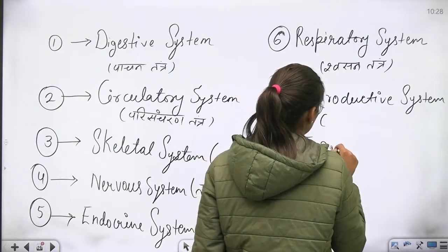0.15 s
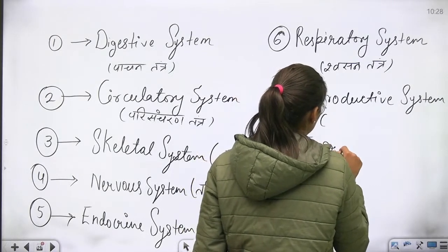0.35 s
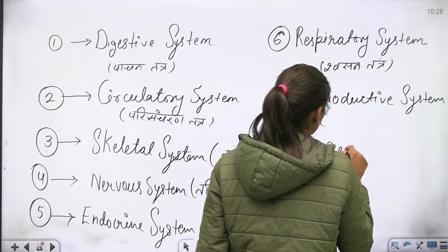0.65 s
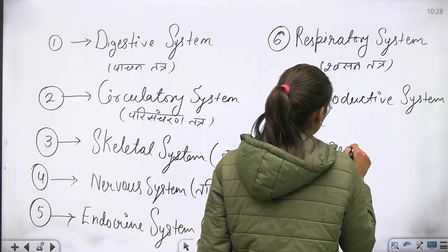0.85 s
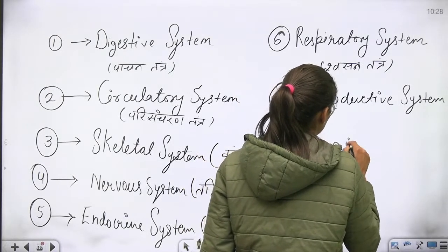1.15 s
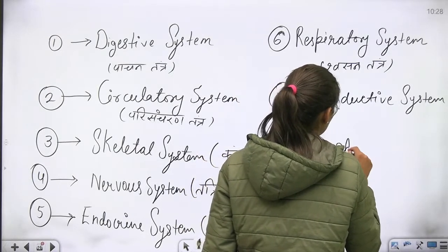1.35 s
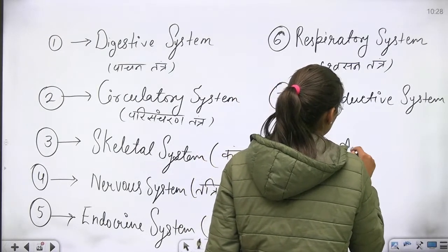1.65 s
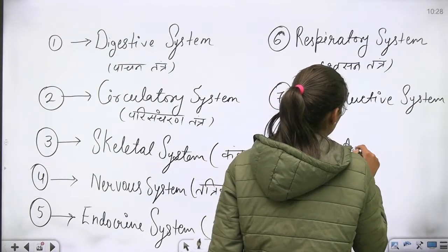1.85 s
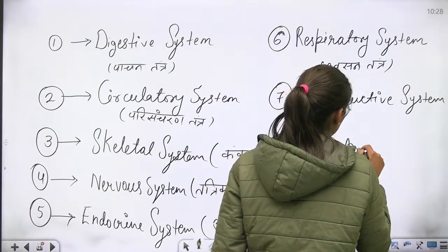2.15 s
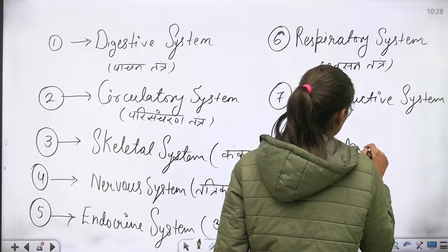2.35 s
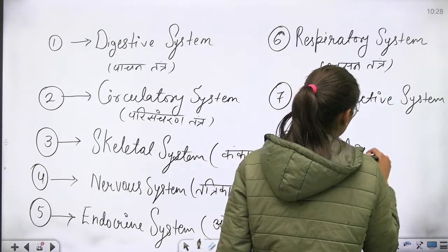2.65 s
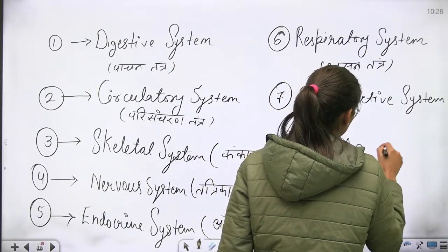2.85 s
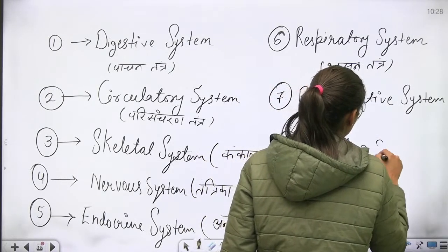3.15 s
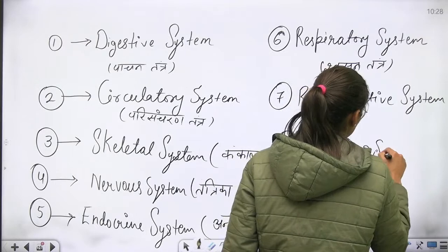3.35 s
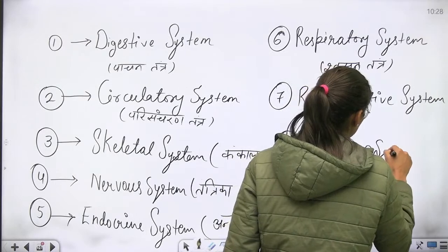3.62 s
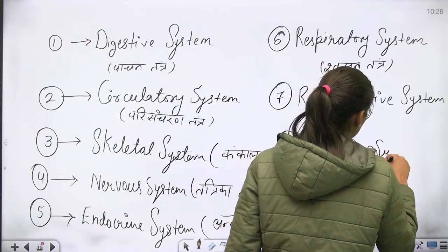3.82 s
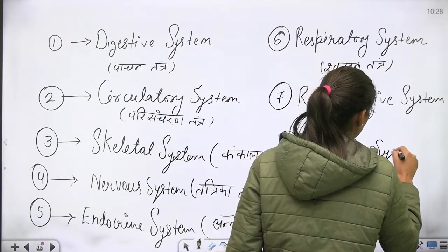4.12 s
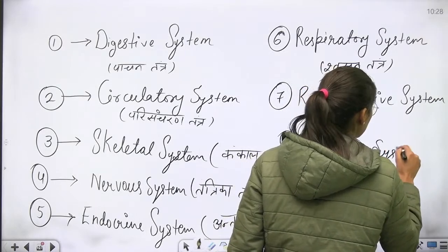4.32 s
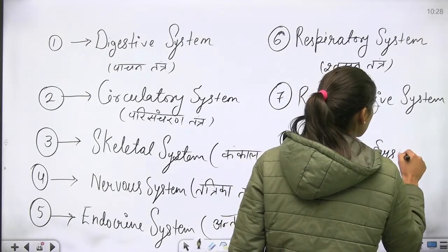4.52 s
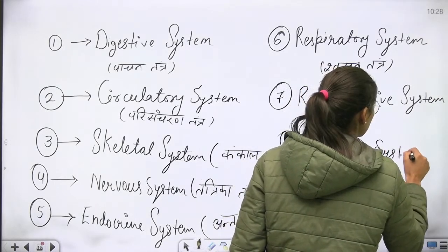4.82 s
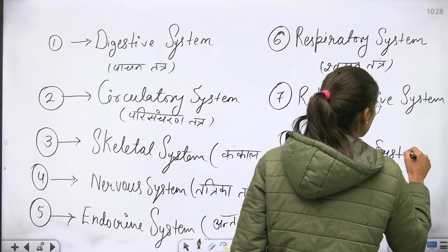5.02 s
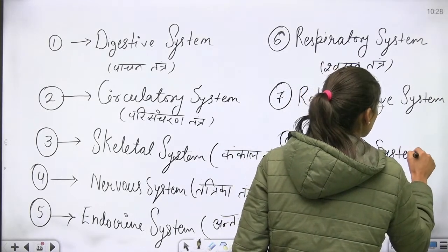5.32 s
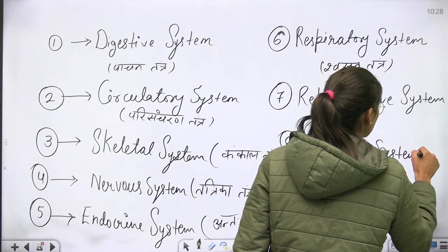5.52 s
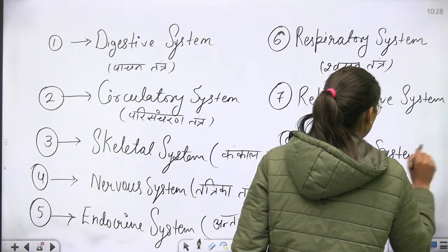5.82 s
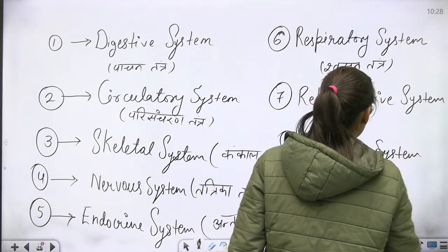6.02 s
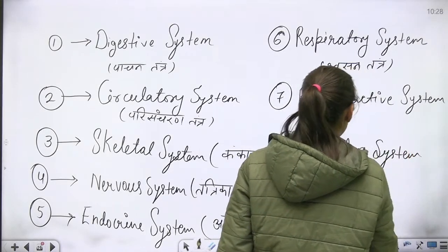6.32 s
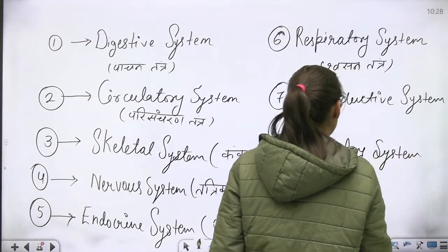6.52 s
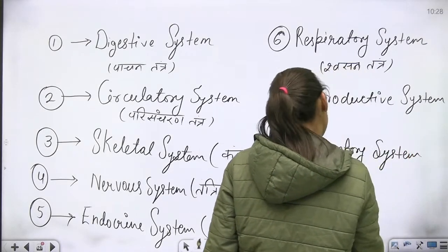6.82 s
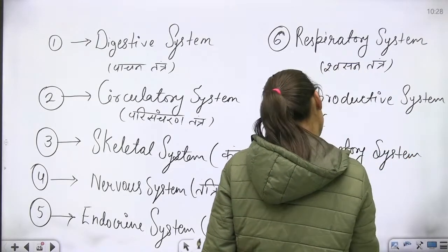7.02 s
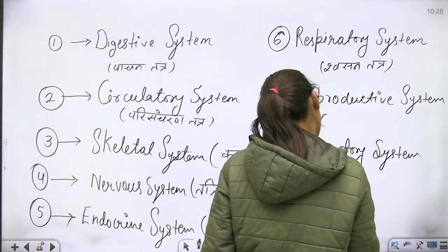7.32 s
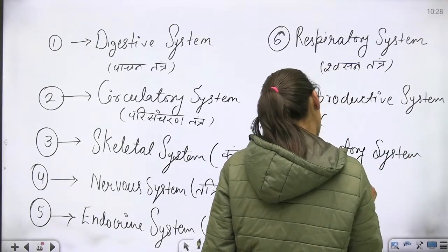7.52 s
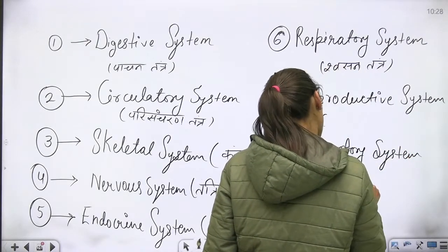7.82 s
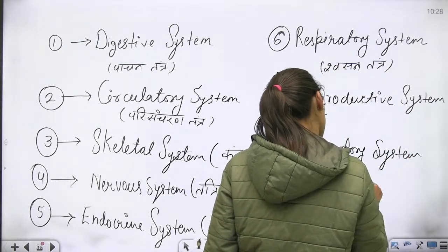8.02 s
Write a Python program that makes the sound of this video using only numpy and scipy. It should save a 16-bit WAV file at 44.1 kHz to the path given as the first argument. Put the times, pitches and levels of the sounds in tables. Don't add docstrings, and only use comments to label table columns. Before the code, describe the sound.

Close, right-leaning pickup of a pen writing on a large glass board in a quiet room. Writing is already under way: faint, thin hissing strokes in quick clusters. Single hard knocks begin new words, each with a bright plastic crack and a short hollow pane ring. Tiny falling squeaks and ticks slip between. Later a hand brushes, a sleeve rustles and knocks crowd together over low fan hum.

```python
import sys
import numpy as np
from scipy import signal
from scipy.fft import rfft, irfft
from scipy.io import wavfile
from scipy.ndimage import uniform_filter1d

SR = 44100
rng = np.random.default_rng(int(sys.argv[2]) if len(sys.argv) > 2 else 0)


def store_pcm(level_fs):
    pcm = np.round(np.clip(level_fs, -1, 1) * 32767).astype(np.int16)
    wavfile.write(sys.argv[1], SR, np.atleast_2d(pcm).T)


def volts_from_decibels(level):
    exponent = np.asarray(level, float) / 20
    return 10 ** exponent


N = 359850


def evened(x):
    return x / np.sqrt(np.mean(x ** 2) + 1e-20)


def read(points, hz):
    f, value = np.transpose(points)
    return np.interp(np.log(hz + 1), np.log(f + 1), value)


def add(mix, s, sound):
    part = mix[round(s * SR):][:len(sound)]
    part += sound[:len(part)]


def resonate(x, hz, width):
    turn = np.exp(2j * np.pi * np.cumsum(hz * np.ones(len(x))) / SR)
    r = np.exp(-np.pi * width / SR)
    return 2 * (turn * signal.lfilter([1 - r], [1, -r], x * turn.conj())).real


def fuzzy(x, hz, width):
    return evened(resonate(resonate(x, hz, width), hz, 2 * width))


def noise(count, size, shape_db):
    hop = size // 4
    hz = np.fft.rfftfreq(size, 1 / SR)[:, None]
    t = np.arange(count // hop + 5) * hop / SR
    a, b = rng.standard_normal((len(t), len(hz), 2)).T
    spectra = (a + 1j * b) * volts_from_decibels(shape_db(hz, t))
    return signal.istft(spectra, nperseg=size, noverlap=size - hop)[1][:count]


def wander(per_s):
    width = round(SR / per_s)
    return evened(uniform_filter1d(uniform_filter1d(rng.standard_normal(N), width), width))


def low_pass(x, hz):
    return signal.oaconvolve(x, signal.firwin(601, hz, window=("kaiser", 9), fs=SR)[None], "same")


def push(t):
    u = t / .00042
    swing = -u ** 2 * np.exp(2 - 2 * u) + 0.32 * (u / 1.6) ** 3 * np.exp(3 - 3 * u / 1.6)
    return signal.lfilter(*signal.butter(1, 350, "high", fs=SR), swing)


def barrel_db(f, rings, top_db):
    peaks_db = sum(db * np.exp(-((f - hz) / 182) ** 2 / 2) for hz, db in rings)
    return peaks_db + top_db * np.clip(f / 8000 - 1, 0, 1)


# f/Hz, level/dB
CRACK_COLOUR = [(710, -36), (1200, -23), (1810, -8), (2600, -1.5), (4190, 0), (5970, 2), (8700, -2),
                (9720, 1.5), (12800, -2), (14300, -7), (15600, -16), (16900, -36)]


def crack(t, rings, top_db):
    burst = evened(noise(512, 64, lambda f, s: read(CRACK_COLOUR, f) + 0 * s))
    burst = burst * np.minimum(t / .0005, 1) * volts_from_decibels(-60 * t / .012)
    z, bins = rfft(burst, 1024), np.fft.rfftfreq(1024, 1 / SR)
    colour = volts_from_decibels(read(CRACK_COLOUR, bins) + barrel_db(bins, rings, top_db))
    even = colour / np.sqrt(uniform_filter1d(abs(z) ** 2, size=7) + 1e-9)
    t60_s = 0.09
    rung = irfft(z * even)[:512] * volts_from_decibels(-60 * t / t60_s)
    return evened(rung) * np.sqrt(np.mean(burst ** 2))


# f/Hz, level/dB
TAIL_COLOUR = [(35, -31), (60, -21.5), (154, -12.5), (350, -14), (573, -10.5), (815, -19), (938, -15.5),
               (1900, -32.5), (2640, -33), (4030, -37.5), (6010, -34), (9840, -32.5), (15000, -46.5),
               (16500, -67.5)]
# f/Hz, t60/s
ROOM_T60 = [(100, 0.49), (260, 0.84), (700, 0.66), (1840, 0.55), (4850, 0.55), (12800, 0.34)]


def room_tail(t, hz, upper_hz, crack_db, ring_db, rings, top_db):
    boom_db, rise_s = -20.5, 0.0017
    bright_db = -16.5 + 0.82 * crack_db - ring_db

    def place_db(f):
        main_db = 9.4 * np.exp(-(np.log(f / hz) / 0.075) ** 2)
        upper_db = 2.6 * np.exp(-(np.log(f / upper_hz) / 0.026) ** 2)
        under_db = -2 * ((f > 240) & (f < .8 * hz))
        return main_db + upper_db + under_db + (boom_db - ring_db) * (f < 300)

    def lumps(f, s):
        field = rng.standard_normal((len(s), len(f)))
        return evened(uniform_filter1d(uniform_filter1d(field, size=8, axis=0), size=9, axis=1)).T

    def tail_db(f, s):
        bright = np.clip((f - 1500) / 1000, 0, 1)
        sparkle_db = bright_db + 0.25 * barrel_db(f, rings, top_db) + 1.1 * lumps(f, s) - .6
        low_db = read(TAIL_COLOUR, f) + 0.51 * place_db(f + 1) - 1 * (f < 1200)
        return low_db + bright * sparkle_db - 40 * (f > 15600) - 60 * s / read(ROOM_T60, f)
    return volts_from_decibels(ring_db + 12.5) * noise(len(t), 512, tail_db) * (1 - np.exp(-t / rise_s))


def knock(db, hz, crack_db, ring_db, top_db, rebound_s, upper_hz, rings, rebound_db):
    t = np.arange(SR * 3 // 5) / SR
    out = room_tail(t, hz, upper_hz, crack_db, ring_db, rings, top_db)
    for f, patch_db in (hz, -9.5), (upper_hz, -12.5):
        ring = -np.sin(2 * np.pi * f * t) * np.minimum(t / 0.00019, 1)
        out += volts_from_decibels(patch_db - 60 * t / 0.027) * ring
    direct = volts_from_decibels(-4.0) * push(t[:512]) + volts_from_decibels(crack_db + 7.0) * crack(t[:512], rings, top_db)
    for delay_s, echo_db in (0, 1.5), (rebound_s, rebound_db), (.0042, -22), (.0062, -28):
        add(out, delay_s, volts_from_decibels(echo_db) * direct)
    return volts_from_decibels(db) * out


# t/s, peak level/dB, pane colour f/Hz, crack level/dB, pane ring level/dB
KNOCKS = [(1.455, -15.5, 570, -10, -28), (2.942, -19, 690, -15.5, -28), (4.44, -15, 500, -8, -27.5),
          (4.688, -12.5, 520, -15, -27), (4.863, -13, 570, -17, -29.5), (6.262, -16.5, 505, -6.5, -29.5),
          (6.618, -12.5, 565, -17, -30.5), (7.209, -16, 633, -24.5, -28.5), (7.507, -13, 635, -12, -28.5),
          (7.94, -11.5, 640, -17, -29), (8.125, -16.5, 590, -10.5, -26.5)]
# t/s, top of the crack level/dB, rebound delay t/s, upper pane colour f/Hz
PEN_ANGLES = [(1.455, 1, 0.0031, 930), (2.9418, -4, 0.002, 1030), (4.4397, 1, 0.0026, 986),
              (4.6876, 0, 0.0029, 854), (4.8634, 1, 0.0025, 914), (6.2606, -1, 0.0019, 950),
              (6.6184, 1, 0.0024, 960), (7.2093, -7, 0.0024, 1040), (7.5066, 2, 0.0033, 1094),
              (7.94, -1, 0.0037, 1083), (8.1248, -1, 0.0027, 1075)]
# f/Hz, level/dB over the crack
LANDING_RINGS = [
    [(2950, 0.5), (5240, 10), (6260, 10.5), (7200, 4), (9860, 7), (11800, 8), (4000, -9), (13400, -12)],
    [(2430, 13), (3300, 10), (5830, 12), (7200, 10), (10490, 6), (11300, 3), (9020, -13.5), (3900, -2)],
    [(3000, 11.5), (5920, 13), (7860, 6), (9800, 5), (10200, -10), (4500, -4), (6600, -3), (10720, 4),
     (11900, 7)],
    [(2760, 13.5), (6400, 7), (4540, 3), (5400, 9), (6080, 9.5), (7500, 7), (11800, 5)],
    [(2780, 10), (6400, 15), (8160, 12), (10500, 9), (4040, -15), (11250, -14), (12490, 7), (15550, 6)],
    [(1290, 24), (2400, 12), (3100, 3), (3630, 6), (4200, 3), (4700, 6), (5040, 2), (7100, 8), (9930, 6.5),
     (8600, -8), (13800, -14), (14700, 11)],
    [(2570, 11.5), (3420, 12), (5080, 9), (7800, 14), (3000, -14), (6700, -9), (8700, -8), (13700, -12),
     (9860, 10), (11600, 5)],
    [(2900, -1), (6850, 17), (7730, 16), (9190, 10), (10550, -3), (12450, 7)],
    [(2560, 12.5), (7400, 2), (9150, -9), (9880, 0), (11030, 2), (12880, 13), (15530, 17)],
    [(2600, 15), (7350, 12.5), (10000, 4), (8700, -10), (10750, 11), (12000, -12), (12510, 9), (13600, 6),
     (15370, 22)],
    [(2540, 10.5), (5000, 8), (7400, 10), (9600, -1), (3300, -5), (6700, -12), (10600, -10), (11300, 11),
     (13030, 15)],
]
REBOUND_DB = [-14, -13, -12, -14, -11, -6, -10, -14, -12, -14, -14]


def landings(mix):
    for (_, *hit), (s, *angle), rings, rebound_db in zip(KNOCKS, PEN_ANGLES, LANDING_RINGS, REBOUND_DB):
        add(mix, s + .001, knock(*hit, *angle, rings, rebound_db))


# f/Hz, t60/s
PANE_T60 = [(130, 0.67), (190, 0.67), (280, 0.41), (420, 0.53), (500, 0.15), (590, 0.43), (760, 0.66),
            (1000, 0.44), (2300, 0.46)]


def pane(modes):
    t, out = np.arange(SR * 3 // 5) / SR, 0
    for (f, db), (phase, beat) in zip(modes, rng.random((len(modes), 2))):
        waver = 1 + 0.15 * np.sin(2 * np.pi * (11.6 * t + beat))
        rise = 1 - np.exp(-t * f / 1.3)
        fade = volts_from_decibels(db + 1.5 - 60 * t / read(PANE_T60, f))
        out = out + fade * rise * waver * np.sin(2 * np.pi * (f * t + phase))
    return out


# f/Hz, level/dB
EARLY_MODES = [
    [(160, -42.5), (253, -47), (344, -49), (465, -45), (576, -38.5), (694, -63), (931, -45.5),
     (1000, -45.5), (2148, -64), (2690, -60)],
    [(135, -41.5), (158, -42.5), (247, -43), (433, -50), (532, -43), (635, -46), (686, -47), (931, -52)],
    [(95, -46), (130, -38.5), (166, -38), (191, -40.5), (317, -47), (409, -39.5), (457, -46), (520, -41),
     (559, -44), (590, -44), (635, -47), (990, -56), (2586, -53)],
]
# f/Hz, level/dB
LATER_MODES = [
    [(129.6, -35), (165.6, -41), (191.5, -40), (1475, -51), (2770, -64), (236.7, -46), (412, -38),
     (453, -41), (500, -39), (571, -35.5), (632, -38.5), (890, -46), (955, -42), (530, -46)],
    [(109, -45), (164.8, -41), (190, -44), (1276, -57), (1450, -57), (2680, -63), (277, -42.5),
     (405, -40.5), (450, -34.5), (538, -32), (643, -41), (770, -51), (1025, -56)],
    [(160.3, -40), (250, -45), (1023, -52), (301, -45), (464, -41), (541, -41.5), (1337, -52), (1980, -54),
     (2210, -54), (2387, -55)],
    [(112, -49), (137, -45), (164, -43), (192, -52), (290, -50), (549, -33), (585, -49), (640, -44),
     (928, -50), (1000, -50), (1092, -50), (1351, -62)],
    [(131.4, -42.5), (192.5, -46), (158.5, -43), (417, -48), (545, -39), (588, -38), (660, -51),
     (780, -49.5), (930, -49.5), (1140, -52), (310, -57)],
    [(131.9, -37), (155.4, -48), (1230, -56), (2600, -65), (2920, -57), (192, -37), (407, -43.5),
     (520, -47), (592, -32), (347, -46), (761, -47), (931, -47), (1061, -45.5)],
    [(135, -39), (192, -37), (357, -47), (411, -45), (500, -54), (589, -32), (659, -36), (928, -42.5),
     (1170, -49)],
    [(192, -41), (411, -50), (500, -41), (589, -42), (659, -40), (928, -61), (1070, -54), (2500, -60)],
]


def pane_rings(mix):
    for (s, *_), modes in zip(PEN_ANGLES, EARLY_MODES + LATER_MODES):
        add(mix, s + .001, pane(modes))


# t/s, length t/s, hiss level/dB at start, hiss level/dB at end
STROKES = [(0, 0.031, -62, -65), (0.061, 0.037, -57, -62), (0.141, 0.047, -56, -59.5),
           (0.255, 0.1, -58.5, -66), (0.354, 0.039, -60.5, -54), (0.398, 0.067, -55.5, -65),
           (0.502, 0.062, -59, -56.5), (0.588, .06, -63, -63), (0.658, 0.12, -57.5, -66.5),
           (.8, .05, -75, -78), (0.987, 0.11, -67.5, -67.5), (1.162, 0.084, -53.5, -59),
           (1.252, 0.04, -66, -78),
           (1.55, 0.03, -61.5, -69), (1.635, 0.049, -59, -54.5), (1.72, 0.052, -60.5, -64),
               (1.79, 0.082, -67, -65), (1.889, 0.055, -59, -62.5), (1.975, 0.044, -60, -65),
               (2.065, 0.062, -58, -59.5), (2.175, 0.042, -60.5, -63), (2.25, 0.074, -60.5, -57.5),
               (2.39, 0.12, -55.5, -59.5), (2.53, 0.12, -57.5, -57), (3.02, 0.083, -62, -63),
               (3.11, 0.083, -59, -61), (3.235, 0.043, -58.5, -58), (3.335, 0.058, -59.5, -64.5),
               (3.41, 0.093, -63, -59), (3.55, 0.043, -60, -60.5), (3.629, 0.067, -63, -57.5),
               (3.745, 0.11, -56, -60.5), (3.85, 0.066, -62, -62), (3.925, 0.13, -54.5, -62),
               (4.085, 0.14, -60.5, -65),
           (4.95, .03, -64, -69), (5.04, 0.054, -55.5, -62), (5.15, 0.07, -61.5, -58),
              (5.262, 0.03, -57, -60), (5.365, 0.042, -60.5, -59), (5.455, 0.036, -63, -63),
              (5.56, 0.056, -59.5, -58.5), (5.655, 0.056, -60.5, -63.5), (6.3, 0.093, -62, -57),
              (6.43, .06, -72, -73), (6.7, 0.1, -71, -67), (6.875, 0.15, -64, -62.5),
              (7.05, 0.13, -74, -80), (7.24, 0.1, -62, -67), (7.36, 0.075, -81, -79),
              (7.6, 0.073, -68, -71), (7.72, 0.068, -66, -61.5), (8.0, .05, -74, -85)]


def hand_speed():
    rise_db_per_s, stop_db_per_s, hover_db = 491, 700., -94
    t = np.arange(0, N + 64, 64) / SR
    start, length, first_db, last_db = np.array(STROKES).T[:, :, None]
    done = np.clip((t - start) / length, 0, 1)
    edge_db = rise_db_per_s * np.maximum(start - t, 0)
    edge_db = edge_db + stop_db_per_s * np.maximum(t - start - length, 0)
    each_db = first_db + (last_db - first_db) * done - edge_db
    done = uniform_filter1d(done[each_db.argmax(0), np.arange(len(t))], size=9)
    speed_db = np.maximum(each_db.max(0), hover_db)
    return [np.interp(np.arange(N) / SR, t, curve) for curve in (speed_db, done)]


# f/Hz, level/dB
BARREL = [(3900, -23.5), (4480, -17), (4750, -8), (5600, -7.5), (6500, -11), (6980, -9.5), (7400, -11),
          (8700, -10.5), (9550, -2.5), (10200, -8), (12000, -11.5), (12600, -8), (13500, -12.5),
          (15900, -16)]
# f/Hz, width f/Hz, level/dB
BARREL_RINGS = [(4800, 220, 1.5), (6980, 110, 5), (9580, 170, 4), (12550, 260, -8), (13500, 400, 3),
                (8500, 250, -2)]
# t/s, lowest band level/dB, top band level/dB, middle ring level/dB
GRIP = [(0, 1, -2, 1), (1.0, -2, 1, 0), (1.2, 1, 1, 6), (1.8, -1, 2, -2), (2.4, -0.5, 0, -2),
        (2.49, -1, 3, 11), (2.56, -1, 4, 2), (2.62, 4, 2, 9), (3.2, -2, 0, 4.5), (4.1, -2.5, 0.5, 1.5),
        (5.0, -8, 1, 2), (5.579, -8, -1, 0), (5.7, -5, 2, 5), (6.4, 0, 4, 7), (6.9, 1, -2, 0),
        (6.98, 4, -1, 7), (7.1, 0, -1, 1), (7.3, 4, 3, 11), (8, -8, 3, -2)]


def strokes():
    t, (speed_db, done) = np.arange(N) / SR, hand_speed()
    press_db = 1 - 0.35 * (speed_db + 63.0)
    slips = rng.standard_normal(N) * volts_from_decibels(2.69 * np.minimum(rng.exponential(1, N), 4))
    slips = slips * volts_from_decibels(0.56 * wander(130.0))
    hz, at, z = signal.stft(slips, SR, nperseg=256, noverlap=192)
    field = rng.standard_normal(z.T.shape)
    patches = evened(uniform_filter1d(uniform_filter1d(field, 28, 0), 7, 1)).T
    s, low_db, top_db, mid_db = np.transpose(GRIP)
    tilt_db = np.outer(hz < 8300, np.interp(at, t, press_db))
    tilt_db += np.outer(hz < 5500, np.interp(at, s, low_db))
    tilt_db += np.outer(hz > 12300, np.interp(at, s, top_db))
    tilt_db += np.outer(np.exp(-((hz - 7050) / 300) ** 2), np.interp(at, s, mid_db))
    quick_db = np.maximum(np.interp(at, t, speed_db) + 66.0, -6)
    tilt_db += np.outer(np.exp(-((hz - 5050) / 400) ** 2), 0.3 * quick_db)
    sag = .03
    for f, width, db in BARREL_RINGS:
        lean = 1 + .01 * wander(9.)[::64]
        centre = f * (np.interp(at, t[::64], lean) + sag * (.5 - np.interp(at, t, done)))
        tilt_db += db * np.exp(-((hz[:, None] - centre) / width) ** 2 / 2) * (1 + 0.25 * patches)
    patch_db = (0.9 + 1.3 * (hz > 11500)[:, None]) * patches
    colour = volts_from_decibels(read(BARREL, hz)[:, None] + tilt_db + patch_db)
    out = signal.istft(z * colour, nperseg=256, noverlap=192)[1][:N]
    hiss = volts_from_decibels(uniform_filter1d(speed_db, 200) + 9.) * out
    echo = noise(SR // 4, 128, lambda f, s: -60 * s / read(ROOM_T60, f))
    return hiss + volts_from_decibels(-9.5) * signal.oaconvolve(hiss, echo / np.linalg.norm(echo))[:N]


def drag():
    white = rng.standard_normal(round(.28 * SR))
    hum = fuzzy(white, 675.0, 35.0) + volts_from_decibels(-3.0) * fuzzy(white, 1050.0, 1500.)
    return volts_from_decibels(-62) * hum * np.sqrt(np.hanning(len(white)))


def squeak(length, from_hz, to_hz, db):
    white = rng.standard_normal(round(length * SR))
    slide_hz = np.linspace(from_hz, to_hz, len(white))
    return volts_from_decibels(db) * np.hanning(len(white)) * fuzzy(white, slide_hz, 160.)


# t/s, length t/s, from f/Hz, to f/Hz, level/dB
SQUEAKS = [
    (1.18, .08, 5250, 4700, -63),
    (1.8, 0.065, 5000, 4850, -65),
    (3, .08, 5050, 4650, -60),
    (2.2, 0.08, 5200, 4750, -64),
    (2.43, 0.12, 7100, 6700, -62),
    (.52, 0.056, 6300, 4900, -69),
    (3, .09, 5200, 5200, -64),
    (5.57, .06, 4600, 4600, -70),
]


def squeaks(mix):
    for s, *row in SQUEAKS:
        add(mix, s, squeak(*row))


def tick(db, hz, width):
    t = np.arange(300) / SR
    return volts_from_decibels(db - 60 * t / .012) * fuzzy(rng.standard_normal(300), hz, width) * .42


# t/s, level/dB, f/Hz, width f/Hz
TICKS = [
    (2.9124, -56, 3000, 4000),
    (3.885, -45, 2300, 400),
    (3.885, -50, 3300, 400),
    (5.641, -46, 6000, 4000),
    (5.875, -41, 8000, 5000),
    (7.019, -48, 3560, 300),
    (7.019, -36, 650, 250),
]


def ticks(mix):
    for s, *row in TICKS:
        add(mix, s, tick(*row))


def hand_rub():
    white = rng.standard_normal(round(0.21 * SR))
    return volts_from_decibels(-69) * np.sqrt(np.hanning(len(white))) * fuzzy(white, 3000., 2500.)


def sleeve():
    start_s, length_s, rise_s = 5.72, 0.526, 0.18
    t = np.arange(N) / SR - start_s
    cloth = fuzzy(rng.standard_normal(N), 6400.0, 5500.0) * volts_from_decibels(2.4 * wander(30.))
    return cloth * volts_from_decibels(-64) * np.clip(0.5 + 0.31 * t / rise_s, 0, 1) * (t > 0) * (t < length_s)


def motor(hz):
    return 0.9 * np.sin(2 * np.pi * np.cumsum(hz * (1 + 0.012 * wander(2.6))) / SR)


# f/Hz, level/dB
AIR = [(12, -49), (20, -24), (38, -3), (62, -9.5), (110, -4.5), (165, -9), (206, -15), (244, -12),
       (297, -12.5), (372, -18), (566, -17.5), (1350, -26.5), (8410, -36), (9410, -34), (15200, -40),
       (16500, -56)]
# f/Hz, width f/Hz
FANS = [(48, 2.4), (78, 35), (125, 4.8), (185, 28)]
FAN_DB = [-56.5, -69.5, -63, -64.5]
# middle t/s, length t/s, level/dB
SWELLS = [
    [(.55, 0.35, -52), (4.95, 0.25, -53), (5.5, 0.25, -54), (5.95, 0.53, -51), (6.5, 0.9, -57),
     (7.1, 0.45, -52), (7.45, 0.3, -60)],
    [(1.5, 0.18, -59), (2.93, 0.64, -54), (3.45, 0.72, -51), (6.3, 0.2, -59)],
    [(.2, 0.5, -58), (3.18, 0.2, -68), (5.1, 0.36, -54), (6.04, 0.27, -54), (7.1, 0.5, -59)],
    [(4.9, 0.65, -51), (7.0, 0.5, -63)],
]
# f/Hz, width f/Hz, level/dB
STEADY_HUMS = [(244.5, 13.2, -67), (565, 19.6, -67.5), (586, 15, -70), (656, 113, -70.5)]


def air():
    now, swell_db = np.arange(N) / SR, 1.5 * wander(2.2)

    def shape_db(hz, t):
        high = np.clip((hz - 900) / 900, 0, 1)
        return read(AIR, hz) + (1 - high) * np.interp(t, now, swell_db) + high * -3.5
    wash = volts_from_decibels(-55.0) * evened(noise(N, 2048, shape_db))
    white = rng.standard_normal(N)
    for (hz, width), db, swells in zip(FANS, FAN_DB, SWELLS):
        level = volts_from_decibels(db + 2. * wander(6.9))
        for s, length, top_db in swells:
            add(level, s - length / 2, volts_from_decibels(top_db) * np.hanning(round(length * SR)))
        wash = wash + level * (0.42 * fuzzy(white, hz, width) + motor(hz))
    for hz, width, db in STEADY_HUMS:
        wash = wash + volts_from_decibels(db + 2 * wander(3)) * fuzzy(white, hz, width)
    return wash


def drone(length, from_hz, to_hz, db):
    hz = np.linspace(from_hz, to_hz, round(length * SR))
    fade = np.sqrt(2 * np.hanning(len(hz)))
    return volts_from_decibels(db) * fade * np.sin(2 * np.pi * np.cumsum(hz) / SR)


# t/s, length t/s, from f/Hz,
# to f/Hz, level/dB
DRONES = [(5.15, 1.09, 181, 178, -58), (6.15, 1.57, 140, 143, -53.5), (6.3, 1.04, 161, 168, -53.5),
          (6.7, 0.68, 246, 270, -62.5), (5.45, 0.4, 110, 118, -56.5), (0.9, 1.1, 118, 120, -57.5),
          (3.5, 0.49, 122, 120, -54.5), (0, .55, 252, 245, -61), (0.84, 0.36, 240, 243, -58),
          (3.5, .6, 250, 245, -60), (2.5, 1.45, 99, 99, -60), (5.2, 0.79, 262, 260, -62.5)]


def drones(mix):
    for s, *row in DRONES:
        add(mix, s, drone(*row))


def scene():
    mix = strokes() + sleeve() + air()
    add(mix, 2.39, drag())
    squeaks(mix)
    ticks(mix)
    add(mix, 5.55, hand_rub())
    drones(mix)
    mix = low_pass(mix[None], 15800)[0]
    landings(mix)
    pane_rings(mix)
    hiss = low_pass(rng.standard_normal((2, N)), 15800)
    return mix * volts_from_decibels([[-6.3], [3.6]]) + volts_from_decibels(-84.0) * hiss


# t/s, length t/s, level/dB
DIPS = [
    (1.437, .008, -11),
    (2.93, .008, -13),
    (4.421, .015, -14),
    (4.68, .004, -10),
    (4.849, .009, -6),
    (6.243, .007, -11),
    (7.197, .007, -12),
    (7.495, .008, -8),
    (7.922, .008, -13),
    (8.113, .008, -9),
]


def duck_treble(dry):
    dip_db = np.zeros(N)
    for s, length, db in DIPS:
        add(dip_db, s, np.full(round(length * SR), float(db)))
    bass = low_pass(dry, 1100.)
    return bass + (dry - bass) * volts_from_decibels(uniform_filter1d(dip_db, size=90))


def roll_off(x):
    return signal.sosfilt(signal.butter(12, 17050, fs=SR, output="sos"), x)


def record(dry):
    mix = low_pass(duck_treble(dry), 17000)
    return roll_off(mix)


dry = scene()
out = record(dry)
store_pcm(out)
```